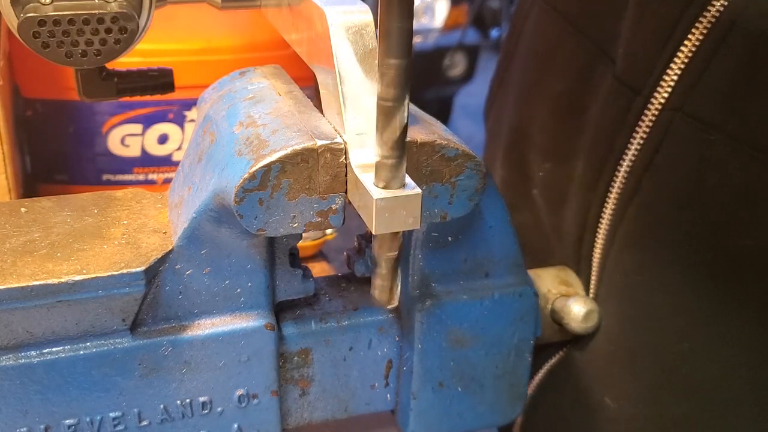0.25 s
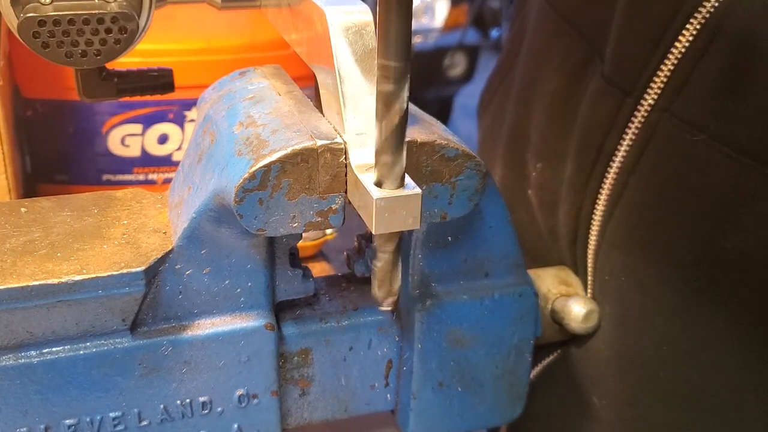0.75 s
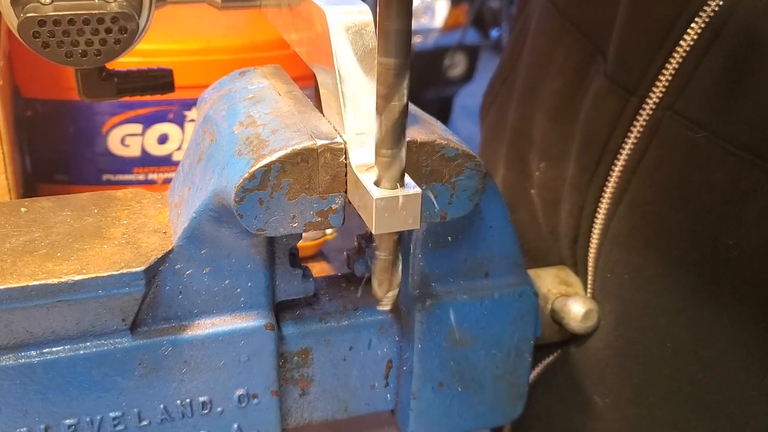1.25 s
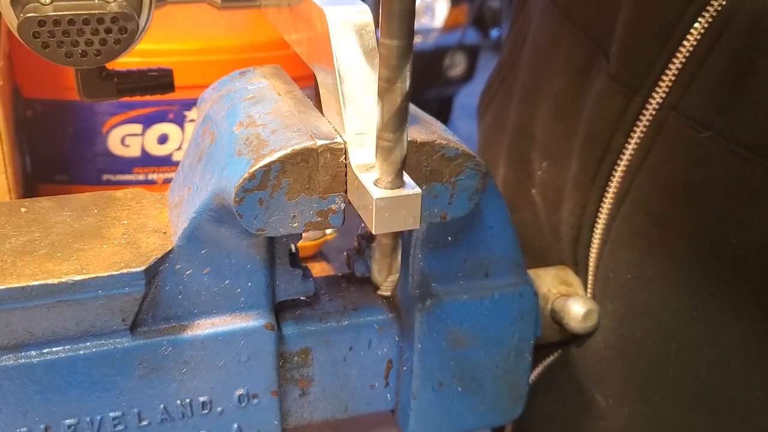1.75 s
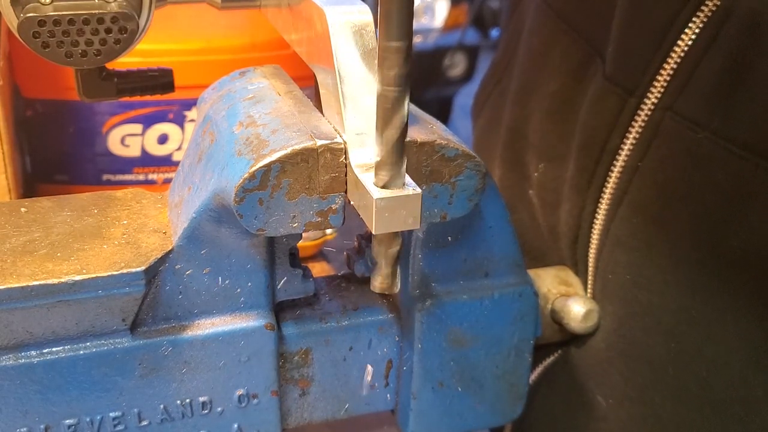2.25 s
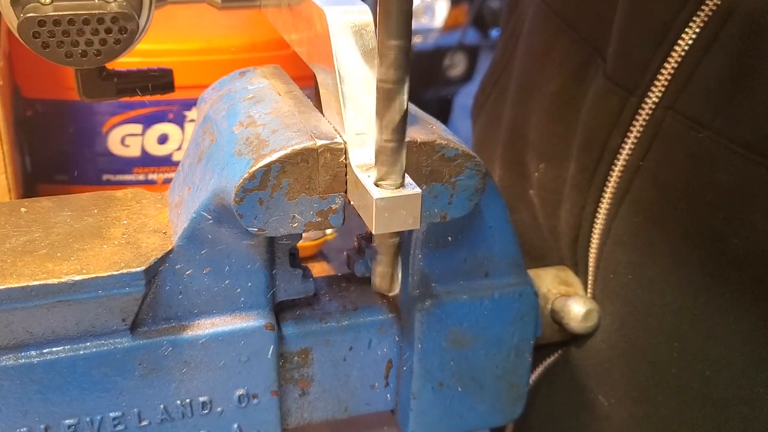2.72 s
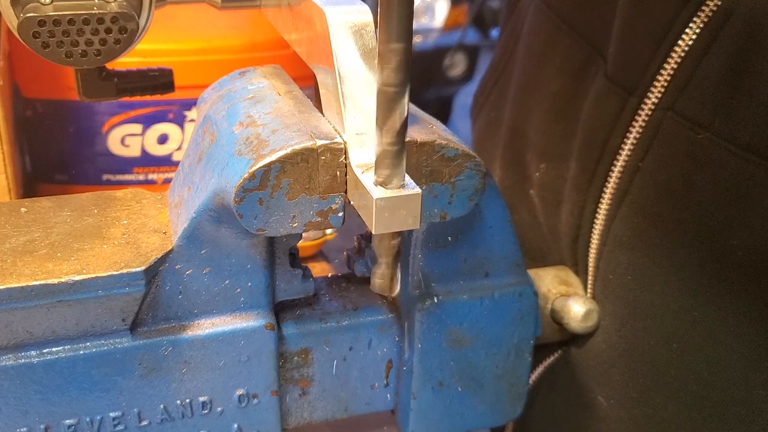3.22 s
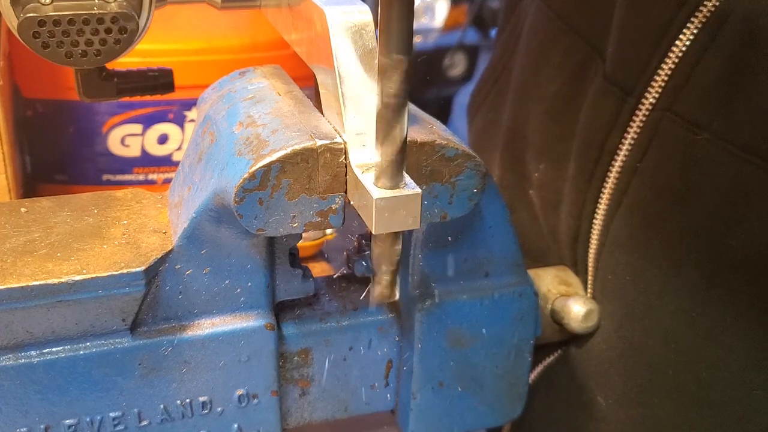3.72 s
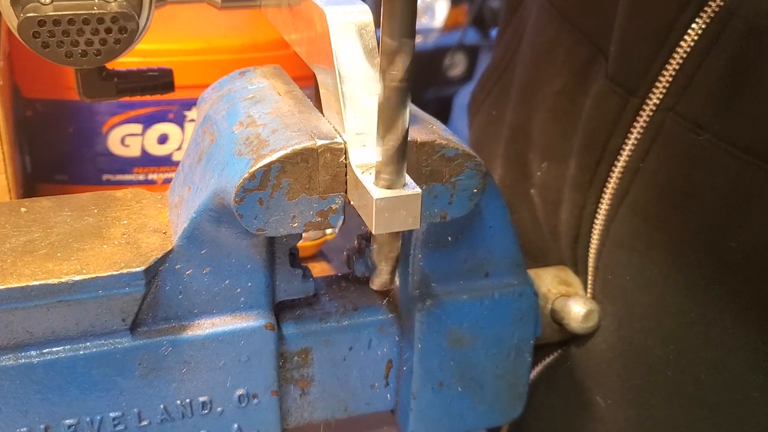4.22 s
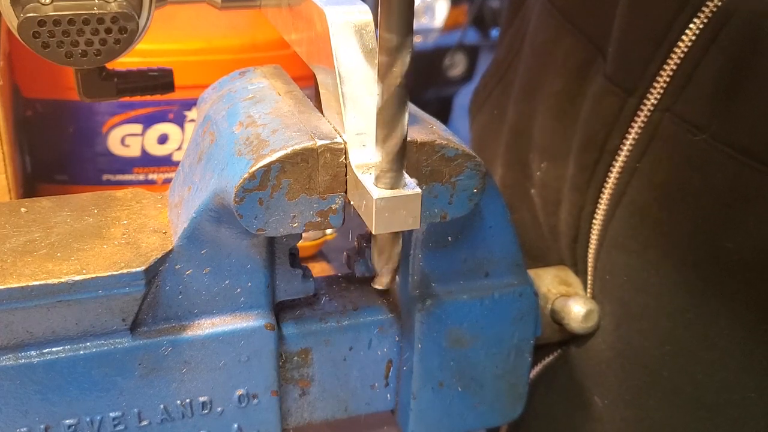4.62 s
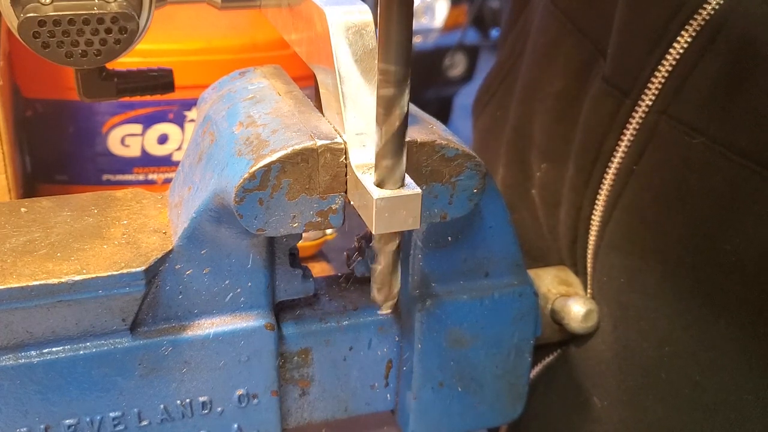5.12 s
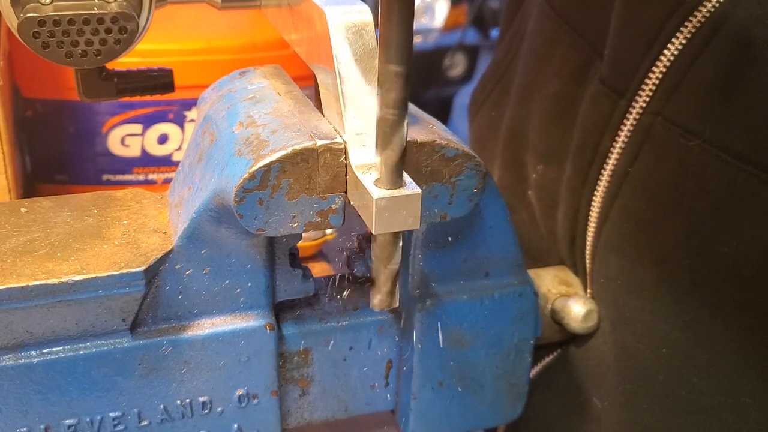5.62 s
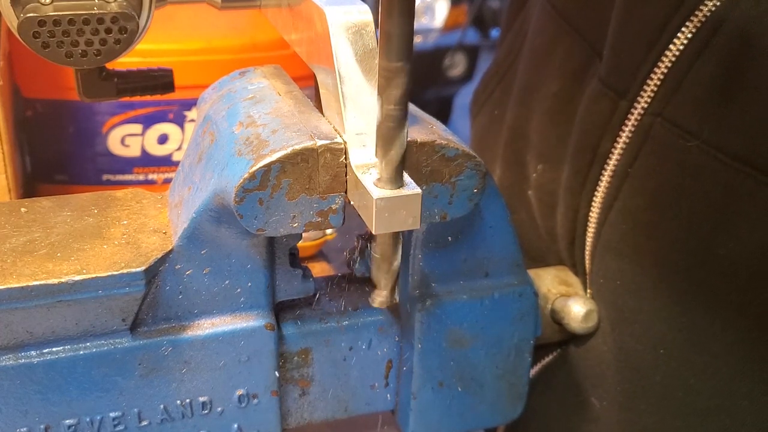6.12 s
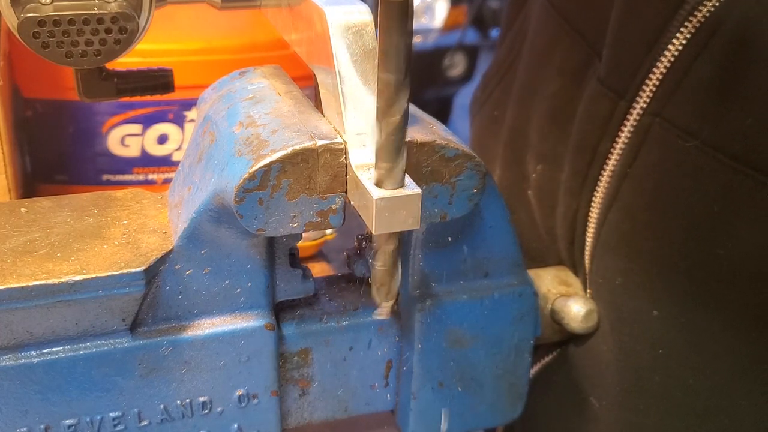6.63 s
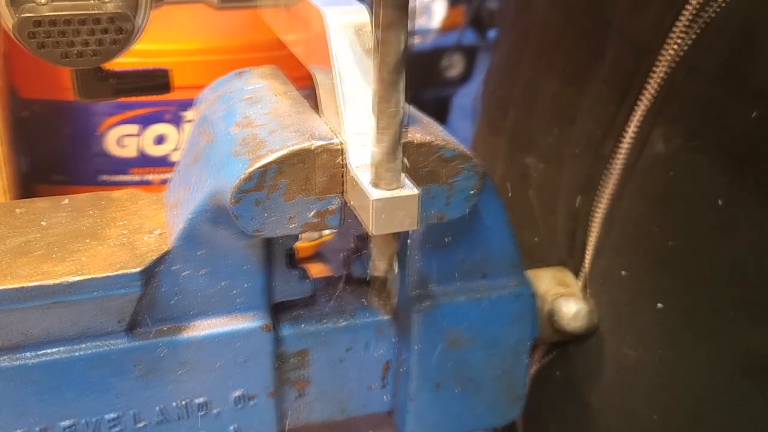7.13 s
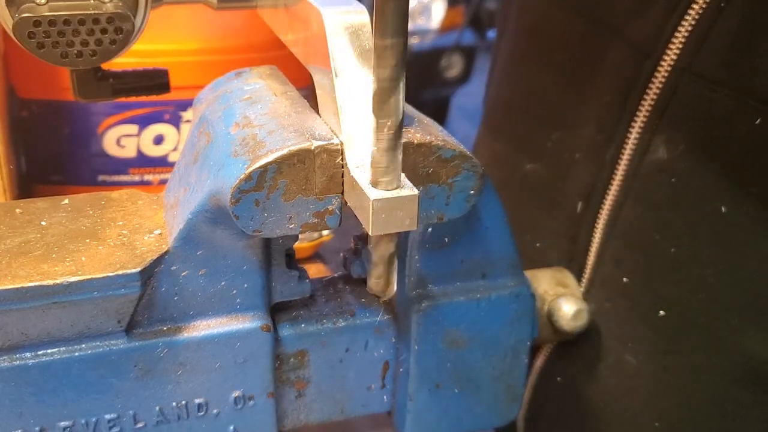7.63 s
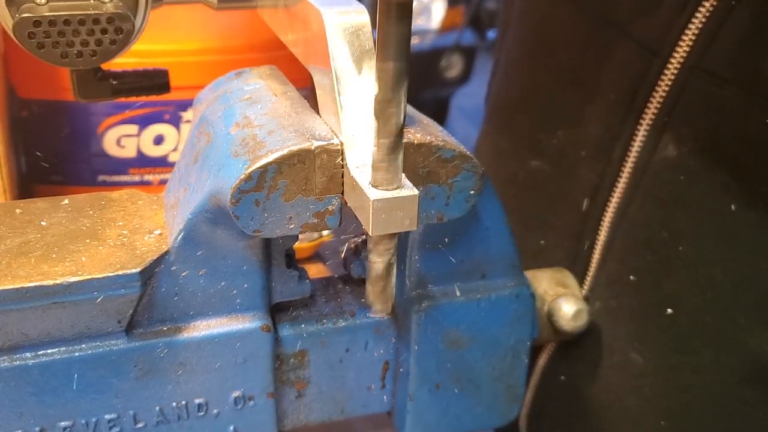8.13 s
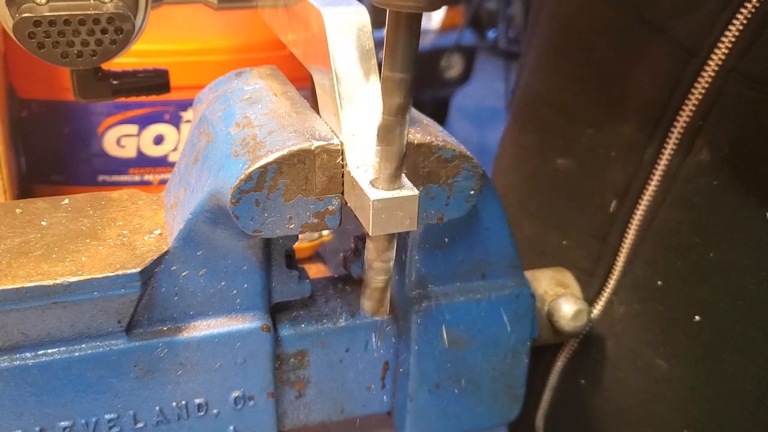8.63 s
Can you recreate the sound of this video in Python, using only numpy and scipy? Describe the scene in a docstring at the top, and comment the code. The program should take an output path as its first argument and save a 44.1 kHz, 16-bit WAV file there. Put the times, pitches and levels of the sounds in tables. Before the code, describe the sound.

An electric drill whines and rattles through aluminium with brief squeaks, then spins in the open hole with a high, wavering tone.

```python
"""A garage, stereo microphone close to a vise: an electric drill bores a block of aluminium.
Motor and gears whine, sag and rattle as the bit bites, over fan hiss and a shaking bench. The bit
chatters when it grabs; chips stick, slip and squeal, and the first loud squeal, near 10 kHz, ducks the
recorder's gain. Near 7 s the cut dissolves into the bit spinning in the open hole, where one motor
order sings."""
import sys
import numpy as np
from scipy import signal
from scipy.fft import rfft, irfft, next_fast_len
from scipy.io import wavfile
from scipy.ndimage import uniform_filter1d, minimum_filter1d

SR = 44100
rng = np.random.default_rng(int(sys.argv[2]) if len(sys.argv) > 2 else 0)


def to_wav(sig):
    """Store sig (one row per channel, or 1-D mono) as 16-bit WAV at the path in sys.argv[1].

    Samples outside -1..1 are clipped; the rate is SR.
    """
    pcm = np.clip(np.atleast_2d(sig), -1, 1) * 32767
    pcm = np.round(pcm).astype(np.int16)
    wavfile.write(sys.argv[1], SR, pcm.T)  # frames by channels


N = 390726
TIME = np.arange(N) / SR


def gain_of(db):
    """Decibels to amplitude."""
    return 10 ** (np.asarray(db) / 20)


def unit_rms(x):
    """Scales to rms 1."""
    return x / np.sqrt(np.mean(abs(x) ** 2) + 1e-20)


def over_time(points):
    """A timed table, joined by straight lines at every sample."""
    return np.interp(TIME, *np.transpose(points))


def over_frequency(points, hz):
    """A short spectrum, joined on a log-frequency axis."""
    f, value = np.transpose(points)
    return np.interp(np.log(hz + 1), np.log(f + 1), value)


def panned(db):
    """Left and right gains of mean power 1."""
    return unit_rms(gain_of(np.array([[db], [-db]]) / 2))


def drift(hz):
    """A complex random signal of rms 1 that wanders at up to about hz."""
    count = 16384
    f = np.fft.fftfreq(count, TIME[-1] / count)
    white = rng.standard_normal(count) + 1j * rng.standard_normal(count)
    slow = np.fft.ifft(np.fft.fft(white) / (1 + (f / hz) ** 2))
    return np.interp(np.linspace(0, count - 1, N), np.arange(count), unit_rms(slow))


# how alike the microphone's two ports hear noise: f/Hz, correlation
PORT_LIKENESS = [(60, 2), (150, -0.1), (400, 0.9), (1400, 0.14), (3000, 0.15), (5000, 0.78), (9000, 0.36),
                 (14000, 1)]
# how far the left port leads: f/Hz, phase/rad
PORT_LEAD = [(0, -0.61), (1400, 0.76), (3000, 0.92), (5000, 1.69), (9000, 1.3), (14000, 1.6)]
# balance of the ports: f/Hz, left-right/dB
PORT_BALANCE = [(60, 0.5), (110, 4), (200, 0.5), (380, -0.5), (700, -1.5), (1290, 2.5), (2380, 1.5),
                (4400, 0.5), (8120, 1.5), (15000, 1.5)]

def stereo_noise(colour, band_hz):
    """Coloured noise at the microphone's two ports, with rms 1 inside a band."""
    size = next_fast_len(N)
    hz = np.fft.rfftfreq(size, 1 / SR)
    left, unrelated = rfft(rng.standard_normal((2, size)))
    alike = np.clip(over_frequency(PORT_LIKENESS, hz), -1, 1)
    balance_db = over_frequency(PORT_BALANCE, hz)
    lag = np.exp(-1j * over_frequency(PORT_LEAD, hz))
    right = (alike * left + np.sqrt(1 - alike ** 2) * unrelated) * lag
    spectra = np.array([left * gain_of(balance_db / 2), right * gain_of(-balance_db / 2)]) * colour(hz)
    in_band = (hz > band_hz[0]) & (hz < band_hz[1])
    power = 2 * np.mean(abs(spectra[:, in_band]) ** 2, 0).sum()
    return irfft(spectra, size)[:, :N] * size / np.sqrt(power)


HOUSING_HZ, HOUSING_WIDTH_HZ, HOUSING_LIFT_DB = 2985, 140, 5.5

def whine(speed, orders, rough, blur_hz, apart, lead_ms):
    """Tones locked to the shaft, lifted near the housing's resonance, smeared by uneven tooth contact."""
    turns, out = np.cumsum(speed) / SR, np.zeros((2, N))
    rough, smear, stray = np.clip(rough, 0, 1), drift(blur_hz), drift(blur_hz / 2)
    for multiple, db, pan_db in orders:
        start, shift = rng.random(2)
        amplitude = np.sqrt(1 - rough) + np.sqrt(rough) * np.roll(smear, int(shift * N))
        lift_db = HOUSING_LIFT_DB / (1 + (2 * (multiple * speed - HOUSING_HZ) / HOUSING_WIDTH_HZ) ** 2)
        # reflections reach the two ports differently, and the left port is a little nearer
        side = apart * np.roll(stray, int(start * N))
        early = np.exp(2j * np.pi * multiple * np.mean(speed) * lead_ms / 1000)
        ports = np.array([(amplitude + side) * early, amplitude - side])
        tone = np.exp(2j * np.pi * (multiple * turns + start))
        out += gain_of(db + lift_db) * panned(pan_db) * (ports * tone).real
    return out


def rattle(modes):
    """Knocks, so dense that they merge into noise, set a few broad resonances ringing."""
    def colour(hz):
        return np.sqrt(sum(gain_of(db) ** 2 / (1 + ((hz - f) / width) ** 2) ** 4
                           for f, width, db in modes))
    return stereo_noise(colour, band_hz=(500, 5000))


def hiss(spectrum, ring):
    """Air from the motor fan and the rub of the flutes, coloured by the ringing metal."""
    def colour(hz):
        lift_db = sum(db / (1 + (2 * (hz - f) / width) ** 2) for f, width, db in ring)
        return gain_of(over_frequency(spectrum, hz) + lift_db)
    return stereo_noise(colour, band_hz=(4000, 8000))


def rumble(spectrum):
    """The bench shakes under the vise."""
    return stereo_noise(lambda hz: gain_of(over_frequency(spectrum, hz)), band_hz=(35, 130))


# the motor as the hand leans and eases off, before grabs and shake: t/s, speed/(turns/s)
CUT_SPEED = [(0.0, 438), (0.2, 443), (0.5, 429), (0.71, 407), (0.83, 418), (1.05, 422), (1.27, 407),
             (1.47, 461), (1.62, 469), (2.6, 462), (3.2, 452), (3.93, 459), (4.7, 451), (5.15, 456),
             (5.42, 432), (5.61, 458), (6.6, 448), (7.4, 450)]
# depth of the cut, heard as loudness: t/s, level/dB
CUT_DEPTH = [(0.0, -4.5), (0.4, -5), (0.65, -2), (1.05, -3), (1.25, 0), (1.5, -2), (1.8, 1), (2.3, -0.5),
             (3.0, 3.5), (3.8, 2.5), (4.4, -0.05), (6.5, -1)]
# gear whine: multiple of motor speed, level/dB, left-right/dB
CUT_GEARS = [(1.25, -28, 9), (1.64, -14, 0), (1.74, -10, 14.5), (2.75, -19, 23), (3.0, -3.5, 1),
             (3.16, -7, -3), (3.22, -6, -7), (3.38, -7, 9), (3.58, -11, 1), (5.0, -24, 6),
             (5.12, -12.6, 19), (6.59, -9.5, 5), (6.8, -15, 14)]
# rotor whine: multiple of motor speed, level/dB, left-right/dB
CUT_ROTOR = [(0.37, -11.5, 0.5), (1.0, -19, -7), (1.999, -6.5, 11), (4.0, 0.2, 5), (5.118, -6, 18),
             (7.0, 3.5, 15), (8.0, -3, 15), (8.501, -14, 27)]
# resonances of gear case and vise: f/Hz, width/Hz, level/dB
CASE_MODES = [(751, 173, -6.5), (1268, 46, 5), (1560, 92, -7), (1680, 270, -2), (2235, 80, -6),
              (2915, 320, -1.5)]
# spectrum of fan air and rubbing: f/Hz, level/dB
CUT_AIR = [(130, -3.5), (170, -5), (280, -4.5), (400, -8.5), (600, -5), (1050, 0), (2000, 4), (2600, 4),
           (3700, 6), (5500, 1.5), (8500, -5.5), (10300, -7), (13000, -7), (15500, -3)]
# resonances of bit and block: f/Hz, width/Hz, lift/dB
CUT_RESONANCES = [(163, 13, 4.5), (3570, 200, 2.5), (4530, 100, 4.5), (4935, 72, 6.5), (5480, 200, 3.5),
                  (6030, 230, 5), (7530, 640, 3.5), (9420, 260, 5), (10340, 360, 6), (12600, 400, 5),
                  (15000, 400, 2.5)]
# spectrum of the shaking bench: f/Hz, level/dB
CUT_BENCH = [(15, -45), (30, -34), (45, -18), (58, 7), (76, -4.5), (95, 1.5), (118, -7.5), (142, -30),
             (166, -20), (190, -20), (300, -24.5), (500, -61)]
FREE_SPEED, LOAD_PER_SPEED_LOST = 467, 0.0032  # turns/s; load gained for each one lost
LIGHT_LOAD, GRAB_LOAD, GRAB_SAG = 0.29, 0.57, 0.03  # base load; hardest grab's load, share of speed lost
GEAR_DB, ROTOR_DB, RATTLE_DB, HISS_DB, RUMBLE_DB = -27.5, -39, -26, -30, -37.5  # before depth and load
GEAR_LOAD_DB, HISS_LOAD_DB = 1.5, 2  # growth per unit of added load

def cutting(grip, jolt):
    """The bit cuts, close up: load slows and shakes the motor and makes the gears rougher and louder."""
    held_speed, depth_db, grab = over_time(CUT_SPEED), over_time(CUT_DEPTH), grip / grip.max()
    strain = LOAD_PER_SPEED_LOST * (FREE_SPEED - held_speed) + GRAB_LOAD * grab
    load = np.clip(LIGHT_LOAD + strain, 0, 1)
    shake = 0.013 * load ** 2 * drift(hz=17).real + 0.0039 * load * drift(hz=7).real
    speed = held_speed * (1 - GRAB_SAG * grab + shake)
    gears = whine(speed, CUT_GEARS, rough=1.3 * load, blur_hz=32.6, apart=0.22, lead_ms=0.076)
    gears *= gain_of(GEAR_DB + depth_db + GEAR_LOAD_DB * strain)
    rotor = whine(speed, CUT_ROTOR, rough=0.7 * load ** 2, blur_hz=35, apart=0.2, lead_ms=0.04)
    rotor *= gain_of(ROTOR_DB - 0.32 * depth_db)  # a deep cut damps the rotor's whine
    bite_db = 2.8 * load * drift(hz=25).real  # the lips catch and let go
    knocks = np.sqrt(load) * rattle(CASE_MODES)
    knocks *= gain_of(RATTLE_DB + 0.91 * depth_db + GEAR_LOAD_DB * strain + bite_db)
    air = hiss(CUT_AIR, CUT_RESONANCES)
    air *= gain_of(HISS_DB + 0.79 * depth_db + HISS_LOAD_DB * strain + 1.06 * bite_db)
    bench = (gain_of(RUMBLE_DB + 0.48 * depth_db) + jolt) * rumble(CUT_BENCH)
    return gears + rotor + knocks + air + bench


# the bit's lips grab the metal: peak t/s, chatter level/dB, half length/s, jolt level/dB
LIP_GRABS = [(0.01, -37, 0.063, -35.5), (1.207, -27.5, 0.034, -40), (1.294, -27.5, 0.022, -36),
             (1.34, -23, 0.026, -42), (1.43, -31.5, 0.023, -32), (2.027, -25.5, 0.034, -33),
             (2.124, -31, 0.026, -38), (2.403, -28, 0.026, -38), (2.474, -28, 0.03, -46),
             (3.497, -32.5, .02, -44), (4.202, -31, 0.052, -43), (4.377, -37.5, 0.0504, -38),
             (4.729, -30, 0.049, -46), (5.009, -30.5, 0.0246, -54), (5.402, -26.5, 0.1, -36),
             (6.092, -37.5, 0.048, -39), (8.814, -29, 0.04, -28)]

def grabs():
    """Each grab swells and lets go: envelopes of the grip on the bit and the jolt to the bench."""
    grip, jolt = np.zeros((2, N))
    for peak_s, chatter_db, half_s, jolt_db in LIP_GRABS:
        swell = np.exp(-np.minimum(((TIME - peak_s) / half_s) ** 2, 20))
        grip += gain_of(chatter_db) * swell
        jolt += gain_of(jolt_db) * swell
    return grip, jolt


# bending modes of the bit: f/Hz, width/Hz, level/dB
BIT_MODES = [(2750, 160, -4.5), (3300, 130, -1.5), (3660, 98, -4)]

def chatter(grip):
    """Each grab rings the bending modes of the bit in a stuttering burst."""
    stutter = unit_rms(gain_of(5.5 * drift(hz=70).real))
    return grip * stutter * rattle(BIT_MODES)


# chips on the bit: t/s, level/dB, start f/Hz, end f/Hz, length/s, rasp/0-1, left-right/dB
CHIP_SQUEALS = [(0.992, -24, 10700, 10400, 0.013, 0.1, 9), (1.2, -28, 13200, 14800, .01, 0.6, 1),
                (1.308, -27, 13400, 13500, .012, .1, 1), (1.453, 6, 9740, 10570, 0.014, 0, 9),
                (2.01, 5, 15600, 14900, 0.0084, 0.05, -8), (2.1145, 11, 15560, 15100, 0.01, 0, 5),
                (5.783, -14, 1440, 2308, 0.016, 0.7, 5), (5.784, -21, 9020, 8680, 0.0097, 0.83, 3),
                (5.91, -30, 10300, 10680, 0.011, 0.1, 1), (6.333, -28, 9500, 9510, .008, 0.21, 1),
                (6.69, -15, 9535, 10070, 0.0097, 0.2, -3), (6.916, -17, 1530, 2000, 0.02, 0.5, 11)]

def squeals():
    """A chip sticks and slips on the bit for some milliseconds: a gliding tone with a scrape in it."""
    out = np.zeros((2, N))
    for start_s, db, start_hz, end_hz, length_s, rasp, pan_db in CHIP_SQUEALS:
        start, count = round(start_s * SR), max(int(length_s * SR), 16)
        progress = np.linspace(0, 1, count)
        hz = end_hz + (start_hz - end_hz) * (1 - progress) ** 2
        tone = np.sin(2 * np.pi * np.cumsum(hz) / SR)
        scrape = rasp * 0.53 * (1 + tone) * rng.standard_normal(SR)[:count]
        swell = np.sin(np.pi * progress ** 0.7) ** 2
        out[:, start:start + count] += gain_of(db) * panned(pan_db) * swell * (tone + scrape)
    return out


# the garage's short reverberation: f/Hz, t60/s
GARAGE_DECAY = [(200, 0.18), (3000, 0.25), (10000, 0.19), (15000, 0.1)]

def garage(direct, wet_db):
    """The room adds sparse reflections of random sign from 3 ms on, the top treble dying first."""
    size = SR // 2
    taps = rng.choice([-1, 1], (2, size)) * (rng.random((2, size)) < 0.06) * (TIME[:size] > 0.003)
    hz, t, spectra = signal.stft(taps, SR, nperseg=256)
    decay = np.exp(-np.log(1000) * t / over_frequency(GARAGE_DECAY, hz)[:, None])
    tail = signal.istft(spectra * decay, SR, nperseg=256)[1]
    reflections = signal.fftconvolve(direct, tail / np.linalg.norm(tail[0]), axes=1)[:, :N]
    return direct + gain_of(wet_db) * reflections


# pitch of the singing motor order: t/s, f/Hz
SING_PITCH = [(6.68, 3412), (6.78, 3345), (6.85, 3235), (6.98, 3408), (7.14, 3418), (7.27, 3305),
              (7.44, 3418), (7.61, 3420), (7.69, 3300), (7.78, 3265), (7.92, 3405), (8.07, 3426),
              (8.18, 3395), (8.42, 3468), (8.67, 3450), (8.78, 3290), (8.86, 3305)]
# the drill sways in the hand: t/s, facing the microphone/0-1
FACING = [(7.05, 0.42), (7.27, 0.34), (7.5, .6), (7.75, 0.16), (7.98, 0.8), (8.2, 0.68), (8.5, 0.15),
          (8.65, 0.3), (8.78, 0.74)]
# gear whine in the open hole: multiple of motor speed, level/dB, left-right/dB
OPEN_GEARS = [(0.38, -42, 3), (0.5, -45, 2), (2.0, -37.5, -4), (2.5, -40.5, 14.5), (3.25, -39, 1),
              (3.5, -32, -3), (4.001, -45, -12), (6.0, -40, 21), (6.751, -38.5, -1), (7.001, -35.5, 17.5)]
# spectrum of fan air and rubbing: f/Hz, level/dB
OPEN_AIR = [(130, -13), (170, -1), (380, -8), (650, 1), (1000, 2), (1350, 8), (2100, 1), (2600, 5),
            (2980, 8), (3600, 6), (4300, 4), (5800, 3), (10000, -2), (15500, -0.5)]
# resonances of bit and block: f/Hz, width/Hz, lift/dB
OPEN_RESONANCES = [(640, 90, 1.8), (4360, 240, 5.3), (5700, 200, 2.2), (6930, 180, 3.9), (7570, 640, 3.3),
                   (8300, 122, 2.9), (8800, 290, 4.4), (10200, 270, 2.2), (12300, 250, 2.4),
                   (13700, 290, 2.5)]
# spectrum of the shaking bench: f/Hz, level/dB
OPEN_BENCH = [(15, -45), (30, -34), (48, -2), (75, 4.5), (110, 2), (138, -16), (166, -3), (190, -18),
              (215, -15), (260, -24), (320, -13), (500, -52)]
SING_ORDER, SING_DB, FACING_DB = 8, -15.5, 4.5  # multiple of motor speed; turned away; added by facing
OPEN_HISS_DB, RUB_DB, OPEN_RUMBLE_DB, GEARS_GROW_DB_PER_S = -29, 2, -40, 2.5

def spinning(jolt):
    """In the open hole one motor order sings, and warbles over more hiss when the bit rubs and slows."""
    pitch, facing = over_time(SING_PITCH), over_time(FACING)
    sag = (pitch.max() - pitch) / np.ptp(pitch)
    speed = pitch / SING_ORDER * (1 + (0.001 + 0.0048 * sag) * drift(hz=17.5).real)
    lead_ms = 0.135 - 0.045 * facing  # the left port hears it first, less so when the drill faces it
    song = whine(speed, [(SING_ORDER, 0, 4.5)], rough=0.02 + 0.25 * sag ** 2,
                 blur_hz=50, apart=0.08, lead_ms=lead_ms)
    song *= gain_of(SING_DB + FACING_DB * facing)
    gears = whine(speed, OPEN_GEARS, rough=0.26 + 0.18 * sag, blur_hz=26, apart=0.17, lead_ms=0.092)
    gears *= gain_of(GEARS_GROW_DB_PER_S * (TIME - TIME[-1]))
    flicker_db = 1.3 * drift(hz=30).real
    air = gain_of(OPEN_HISS_DB + RUB_DB * sag + flicker_db) * hiss(OPEN_AIR, OPEN_RESONANCES)
    bench = (gain_of(OPEN_RUMBLE_DB) + jolt) * rumble(OPEN_BENCH)
    return song + gears + air + bench


def scene():
    """At the vise the cut dissolves into the free run; the bit chatters and chips squeal over both."""
    grip, jolt = grabs()
    dissolve = np.interp(TIME, [6.55, 7.4], [0, 1])
    drill = np.sqrt(1 - dissolve) * cutting(grip, jolt) + np.sqrt(dissolve) * spinning(jolt)
    return drill + chatter(grip) + garage(squeals(), wet_db=-9)


LIMIT_DB, HOLD_S, RECOVER_DB_PER_S, BAND_LIMIT_HZ = -11.7, 1.0, 7.4, 15950

def record(dry):
    """The recorder's gain drops at a peak, holds and creeps back; then clipping and the band limit."""
    # the gain control is deaf to the top treble
    sensed = signal.sosfiltfilt(signal.butter(8, 12500, fs=SR, output="sos"), dry)
    power_db = 10 * np.log10(abs(uniform_filter1d((sensed ** 2).mean(0), size=200)) + 1e-12)
    over_db = np.maximum(power_db - LIMIT_DB, 0)
    half_hold = int(HOLD_S * SR) // 2
    held_db = -minimum_filter1d(-over_db, 2 * half_hold + 1, origin=half_hold)
    recovery_db = TIME * RECOVER_DB_PER_S
    duck_db = uniform_filter1d(np.maximum.accumulate(held_db + recovery_db) - recovery_db, size=100)
    ducked = np.clip(dry / gain_of(duck_db), -1, 1)
    lowpass = signal.firwin(401, BAND_LIMIT_HZ, window=("kaiser", 9), fs=SR)
    return signal.oaconvolve(ducked, lowpass[None], "same")


dry = scene()
out = record(dry)
to_wav(out)
```